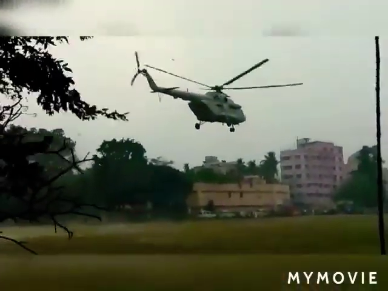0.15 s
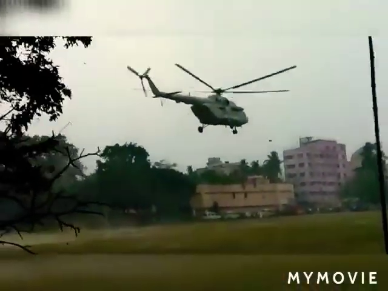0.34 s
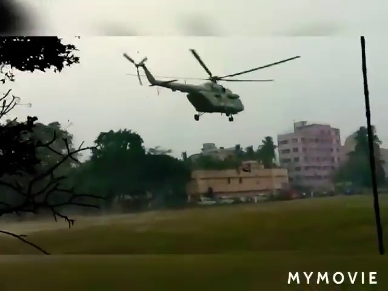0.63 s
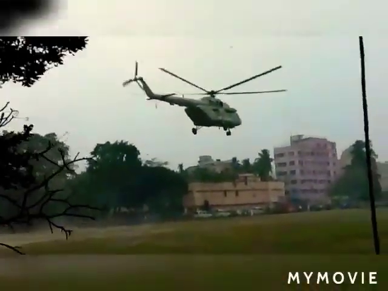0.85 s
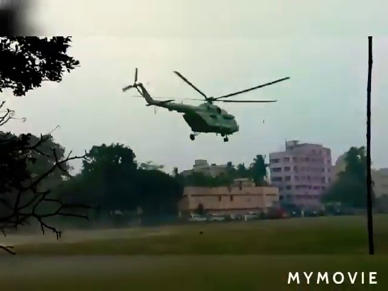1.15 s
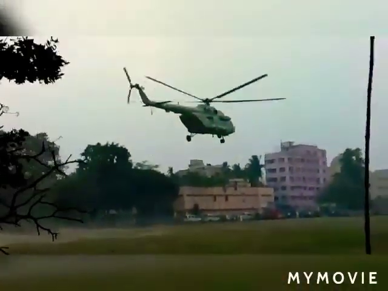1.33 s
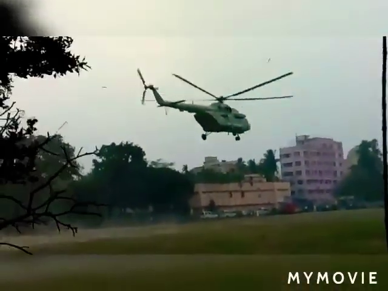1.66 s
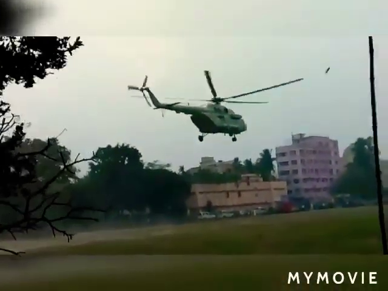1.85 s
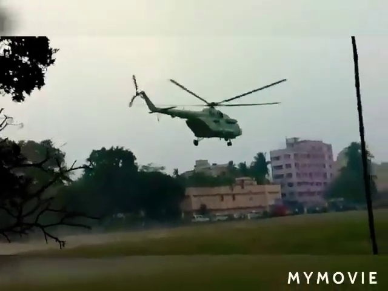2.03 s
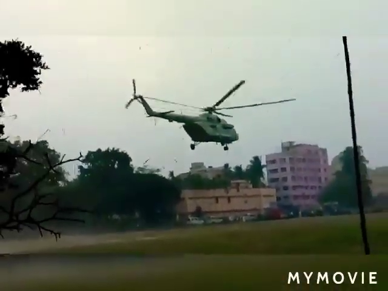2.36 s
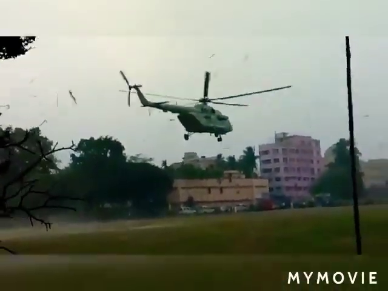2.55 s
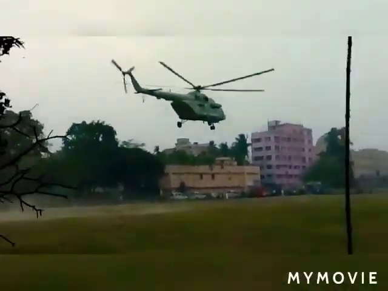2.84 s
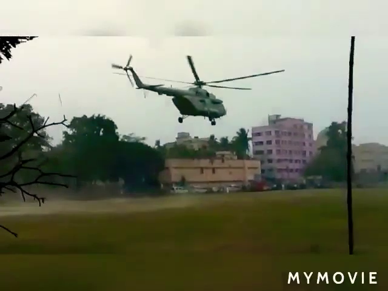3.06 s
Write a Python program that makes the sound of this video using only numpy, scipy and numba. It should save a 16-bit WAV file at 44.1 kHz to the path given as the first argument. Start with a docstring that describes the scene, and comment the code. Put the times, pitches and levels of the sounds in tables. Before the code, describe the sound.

A heavy helicopter hovers low and close, rotor chopping fast over roaring engines and buffeting wind.

```python
"""Low over a field, a heavy five-bladed turbine helicopter hovers, heard from a phone in its downwash. Each
blade is a burst of air noise; breathy tones on two of them swoop in pitch once a turn. The tail rotor drones in
harmonics, and the turbines hiss over a roar of shaped noise. Wind noise buffets the microphone and short
falling thumps land among it; brief noise swells add breathy whistle rises. Three sharp ringing ticks, probably
flying grit, make the limiter duck."""
import sys
import numpy as np
from scipy import signal
from scipy.fft import rfft, irfft
from scipy.io import wavfile
from numba import njit

SR = 44100
rng = np.random.default_rng(int(sys.argv[2]) if len(sys.argv) > 2 else 0)


def digitize_waveform(pressure):
    """Quantize a signal to 16-bit integers and store it at the path in sys.argv[1].

    Rows of a 2-D input are taken as channels; values are limited to [-1, 1].
    """
    field = np.atleast_2d(pressure).T
    bounded = np.clip(field, -1, 1)
    quanta = np.round(bounded * 32767).astype(np.int16)
    wavfile.write(sys.argv[1], SR, quanta)


N = 141120
T = np.arange(N) / SR  # time of every sample, seconds

# main rotor: time of one turn, time of the first blade pass
TURN_S, FIRST_BLADE_S, BLADES = .3133, .028, 5

# tail rotor: pitch of its blade rate, overall level, pitch waver as a fraction
TAIL_HZ, TAIL_DB, TAIL_WAVER = 56.05, -23.5, 0.0074
# tail rotor harmonics: multiple of its blade rate, relative level_db
TAIL_HARMONICS = [(1, 4), (2, 15.5), (3, 12.5), (4, -18.5), (5, -0.5), (6, -24)]

# tone of the rotor wake and exhaust: pitch_hz, relative level_db per Hz
ROAR_COLOUR = [(20, -31), (60, -6.5), (120, -2), (190, -1), (270, 0.5), (360, 0.5), (480, -2.5),
               (620, -9.5), (740, -8), (950, -18), (1300, -18.5), (2200, -22.5), (4000, -24), (15000, -74)]
# loudness of the wake and exhaust: time_s, level_db
ROAR_LEVEL = [(0, -19), (.25, -15.5), (.5, -13), (1, -12), (1.6, -12), (2.2, -13.5), (2.6, -12), (3.2, -16)]
ROAR_THROB_DB, ROAR_FLICKER_DB = 0.5, 1.5
RASP_HZ, RASP_WIDTH_HZ, RASP_THROB_DB = 807, 313, 1.5
# loudness of the hollow rasp in the rotor wake: time_s, level_db
RASP_LEVEL = [(0, -22), (.12, -18), (.35, -22), (.6, -22), (.8, -26), (1, -30), (1.45, -23.5), (1.8, -30),
              (2.2, -29.5), (2.8, -26), (3.2, -28.5)]

# tone of the turbine hiss: pitch_hz, relative level_db per Hz
TURBINE_COLOUR = [(800, -10), (1600, -1.5), (2300, -4), (3050, 1), (3600, -0.5), (4200, -6), (5000, 0),
                  (5800, 2.5), (6600, 3.5), (7200, -4.5), (8100, -14), (9600, -20), (11200, -29.5),
                  (12700, -28.5), (13700, -35), (15000, -27), (16000, -36)]
# loudness of the turbine hiss: time_s, level_db
TURBINE_LEVEL = [(0, -17), (.06, -15), (.2, -17), (.28, -19.5), (.55, -18.5), (.75, -18.5), (1.05, -18.5),
                 (1.25, -18.5), (1.5, -20), (1.68, -18.5), (1.88, -18), (2.1, -20.5), (2.28, -17.5),
                 (2.45, -21), (2.67, -19), (2.8, -19), (3.05, -18.5), (3.2, -15.5)]
TURBINE_FLICKER_DB = 1.25
WHINE_HZ, WHINE_WIDTH_HZ, WHINE_DB = 6245, 35, -38

# tone of wind on the microphone: pitch_hz, relative level_db per Hz
WIND_COLOUR = [(10, -24), (22, -7), (35, -28), (58, -7), (100, -2), (160, -5.5), (300, -11.5), (700, -14.5),
               (2000, -65)]
# loudness of the wind: time_s, level_db
WIND_LEVEL = [(0, -24), (.33, -33), (.41, -15), (.53, -14), (.66, -18), (1.05, -22), (1.2, -14), (1.5, -20),
              (1.75, -19), (1.9, -18), (2.15, -17), (2.35, -15.5), (2.8, -16.5), (3.2, -22)]
WIND_THROB_DB, WIND_LAG_S = 1.5, 0.03
# short, falling thumps: middle_s, peak level_db, pitch_hz at the middle
THUMPS = [(0.421, -5, 111), (0.501, -6, 101), (.605, -1.5, 147), (1.151, -2.5, 125), (1.205, -10, 102),
          (1.59, -7, 227), (1.902, -8, 100), (1.976, -4, 273), (2.119, -5, 103), (2.177, -3, 105),
          (2.302, -17, 100), (2.432, -0.5, 97), (2.533, -1, 96), (2.637, -8.5, 198), (2.748, -2.5, 94),
          (2.819, -6, 98), (2.866, -6.5, 144), (2.92, -8.5, 252), (2.989, -8.5, 242), (3.049, -5, 262),
          (3.111, 1, 290), (3.167, -8.5, 365)]
THUMP_S, THUMP_FALL_PER_S = 0.0058, 17.5  # swell width; share of the middle pitch lost per second

SWISH_ATTACK_S, SWISH_DECAY_S, SWISH_SCATTER_DB = 0.0026, 0.013, 2
# loudness of a blade swish at its crest, before the scatter: time_s, level_db
SWISH_LEVEL = [(0, -16), (.1, -9.5), (.35, -12), (.47, -16), (.58, -12), (.78, -10.5), (1.1, -19),
               (1.46, -14.5), (1.59, -12), (1.72, -8.5), (1.85, -16.5), (2.4, -18), (2.7, -16.5),
               (3.2, -19.5)]
# tone of the swish: pitch_hz, relative level_db per Hz
SWISH_COLOUR = [(150, -7), (500, 20), (1000, 4), (1800, 4.5), (3100, 10), (4300, -5.5), (6500, -16),
                (8500, -14), (15000, -37)]
# hard slaps of a blade cutting a wake: crest_s, level_db, centre pitch_hz
SLAPS = [(.092, -4, 850), (0.155, -17, 800), (0.344, -10.5, 900), (0.587, -16, 2500), (0.777, -15, 750),
         (.966, -19, 2520), (1.531, -12, 1190), (1.595, -12, 1820), (1.719, -19, 1600)]
SLAP_ATTACK_S, SLAP_DECAY_S, SLAP_WIDTH_HZ = 0.00033, 0.012, 1200

# breathy rises of a blade's whistle as the blade swings toward the listener:
# middle_s, level_db, centre pitch_hz
WHISTLE_RISES = [(0.058, -13, 6000), (.309, -19, 6470), (.747, -15.5, 6140)]
RISE_S, RISE_WIDTH_HZ = 0.004, 660
# whistles of two neighbouring blades: fastest_approach_s, top pitch_hz, level_db before beam and dulling
WHISTLES = [(.093, 10470, -19), (0.156, 9740, -19), (.406, 10600, -20.5), (0.467, 9700, -20.5),
            (.78, 9600, -24), (1.036, 10240, -23), (1.1, 9600, -18), (1.35, 10000, -29),
            (1.41, 9430, -16.5), (1.663, 10440, -25.5), (1.725, 9520, -17.5), (1.976, 10400, -23.5),
            (2.039, 9700, -16.5), (2.292, 10000, -28), (2.35, 9700, -21), (2.603, 10300, -25),
            (2.664, 9820, -17.5), (2.917, 10800, -22.5), (2.975, 10130, -18.5)]
# beam of a whistle: blade angle_rad from fastest approach, level_db
WHISTLE_BEAM = [(-1, -40), (-1, -3), (-.6, -16), (0.36, -3.5), (-0.41, 0), (0.766, 1), (1.28, -9),
                (2.4, -35)]
# dulling of a whistle: pitch_hz, level_db
WHISTLE_COLOUR = [(4000, 1.5), (6600, 4.5), (8000, -12), (10500, -9.5)]
WHISTLE_MACH = .575  # speed of the whistling spot as a share of the speed of sound
WHISTLE_WIDTH_HZ, WHISTLE_BREATH_HZ, WHISTLE_BREATH_DB = 450, 1300, -4

# grit ticking on the phone: start_s, level_db, ring pitch_hz
TICKS = [(.6155, 14, 5600), (2.456, 15, 3400), (2.4648, 17.5, 3200)]
TICK_DECAY_S, TICK_CRACK_DB, TICK_CRACK_HZ = .00035, -12, 5500

LIMIT_DB, LIMIT_ATTACK_S, LIMIT_RELEASE_S = -2, 0.00022, .033
CLIP_LEVEL, CLIP_HARDNESS = 0.65, 14
TOP_HZ = 15700  # cutoff of the final treble cut


def undb(db):
    """Turn decibels into gain."""
    return 10 ** (np.asarray(db) / 20)


def unit(x):
    """Scale to an average (rms) strength of 1."""
    return x / np.sqrt(np.mean(x ** 2))


def curve(table, at=T):
    """Draw straight lines through the rows of a table."""
    return np.interp(at, *np.array(table, float).T)


def noise(colour):
    """Noise of rms 1, its tone shaped by pitch and level points."""
    hz, db = np.array(colour, float).T
    f = np.maximum(np.fft.rfftfreq(N, 1 / SR), 1)
    shape = undb(np.interp(np.log(f), np.log(hz), db))
    return unit(irfft(rfft(rng.standard_normal(N)) * shape, N))


def band(centre_hz, width_hz):
    """Noise of rms 1 in a bell-shaped band."""
    f = np.fft.rfftfreq(N, 1 / SR)
    shape = np.exp(-((f - centre_hz) / width_hz) ** 2)
    return unit(irfft(rfft(rng.standard_normal(N)) * shape, N))


def walk(rate_hz):
    """Random wandering with a spread of 1; a higher rate wanders faster."""
    return band(0, rate_hz)


def bump(at_s, width_s):
    """A smooth swell around one moment."""
    return np.exp(-.5 * ((T - at_s) / width_s) ** 2)


def burst(at_s, attack_s, decay_s):
    """A quick swell and an exponential fall."""
    return np.where(T < at_s, bump(at_s, attack_s), np.exp(-abs(T - at_s) / decay_s))


def throb(lag_s):
    """A cosine at the blade rate that peaks lag_s after each pass."""
    return np.cos(2 * np.pi * (T - FIRST_BLADE_S - lag_s) * BLADES / TURN_S)


@njit
def follow(x, attack, release):
    """Track peaks, moving by one share of the gap when rising and another when falling."""
    out, level = np.empty(len(x)), 0.
    for i in range(len(x)):
        level += (x[i] - level) * (attack if x[i] > level else release)
        out[i] = level
    return out


def tail_rotor():
    """A low drone whose harmonics fade in and out in the turbulent air."""
    hz = TAIL_HZ * (1 + TAIL_WAVER * walk(2.55))
    phase = 2 * np.pi * np.cumsum(hz) / SR
    drone = np.zeros(N)
    for multiple, db in TAIL_HARMONICS:
        gain = undb(db + 1.15 * walk(2))
        drone += gain * np.sin(multiple * phase + rng.uniform(0, 2 * np.pi))
    return undb(TAIL_DB) * unit(drone)


def roar():
    """Rotor wake and exhaust throb lightly at the blade rate, with a hollow rasp that fades unevenly."""
    body_db = curve(ROAR_LEVEL) + ROAR_THROB_DB * throb(lag_s=.001) + ROAR_FLICKER_DB * walk(20)
    rasp_db = curve(RASP_LEVEL) + RASP_THROB_DB * throb(lag_s=.004)
    return noise(ROAR_COLOUR) * undb(body_db) + band(RASP_HZ, RASP_WIDTH_HZ) * undb(rasp_db)


def turbines():
    """Broad, flickering engine hiss with a compressor whine made of a thin band of noise."""
    hiss = noise(TURBINE_COLOUR) * undb(curve(TURBINE_LEVEL) + TURBINE_FLICKER_DB * walk(34))
    return hiss + undb(WHINE_DB) * band(WHINE_HZ, WHINE_WIDTH_HZ)


def downwash():
    """Wind rumbles on the microphone at the blade rate; short, falling thumps land among it."""
    out = noise(WIND_COLOUR) * undb(curve(WIND_LEVEL) + WIND_THROB_DB * throb(WIND_LAG_S))
    for at, db, hz in THUMPS:
        age = T - at
        turns = hz * age * (1 - THUMP_FALL_PER_S * age / 2)
        wave = np.sin(rng.uniform(0, 2 * np.pi) + 2 * np.pi * turns)
        out += undb(db) * bump(at, THUMP_S) * wave
    return out


def blade_swish():
    """A burst of air noise as each blade sweeps toward the listener, and a few hard slaps."""
    passes = np.arange(FIRST_BLADE_S, T[-1], TURN_S / BLADES)
    sizes = undb(SWISH_SCATTER_DB * rng.standard_normal(len(passes)))
    gate = sum(size * burst(at, SWISH_ATTACK_S, SWISH_DECAY_S) for at, size in zip(passes, sizes))
    out = gate * undb(curve(SWISH_LEVEL)) * noise(SWISH_COLOUR)
    for at, db, hz in SLAPS:
        out += undb(db) * burst(at, SLAP_ATTACK_S, SLAP_DECAY_S) * band(hz, SLAP_WIDTH_HZ)
    return out


def whistle_rises():
    """Breathy rise of a blade's whistle as it swings toward the listener: a brief swell of band noise."""
    return sum(undb(db) * bump(at, RISE_S) * band(hz, RISE_WIDTH_HZ) for at, db, hz in WHISTLE_RISES)


def blade_whistles():
    """Breathy tones ride round on two blades; speed toward the listener raises the pitch (Doppler)."""
    angle = np.linspace(-np.pi, np.pi, N)
    # sound sent out on the way round arrives earlier or later as the distance changes
    arrival_s = TURN_S * (angle - WHISTLE_MACH * np.sin(angle)) / (2 * np.pi)
    core = walk(WHISTLE_WIDTH_HZ) + 1j * walk(WHISTLE_WIDTH_HZ)
    breath = walk(WHISTLE_BREATH_HZ) + 1j * walk(WHISTLE_BREATH_HZ)
    flutter = core + undb(WHISTLE_BREATH_DB) * breath
    out = np.zeros(N)
    for at, top_hz, db in WHISTLES:
        near = abs(T - at) < TURN_S / 2
        heard_angle = np.interp(T[near] - at, arrival_s, angle)
        hz = top_hz * (1 - WHISTLE_MACH) / (1 - WHISTLE_MACH * np.cos(heard_angle))
        tone = (flutter[near] * np.exp(2j * np.pi * np.cumsum(hz) / SR)).real
        out[near] += tone * undb(db + curve(WHISTLE_BEAM, heard_angle) + curve(WHISTLE_COLOUR, hz))
    return out


def grit():
    """Very short, very strong cracks that ring the phone's case."""
    out = np.zeros(N)
    crack = undb(TICK_CRACK_DB) * band(TICK_CRACK_HZ, TICK_CRACK_HZ / 2)
    for at, db, hz in TICKS:
        age = np.maximum(T - at, 0)
        fade = (age > 0) * np.exp(-age / TICK_DECAY_S)
        out += undb(db) * fade * (np.sin(2 * np.pi * hz * age) + crack)
    return out


def scene():
    """Add up everything that reaches the single microphone."""
    steady = tail_rotor() + roar() + turbines() + downwash()
    blades = blade_swish() + whistle_rises() + blade_whistles()
    return (steady + blades + grit())[None]


def record(dry):
    """A limiter ducks after overloads, the remaining peaks are flattened, and the top is cut."""
    peak = follow(abs(dry[0]), 1 / max(LIMIT_ATTACK_S * SR, 1), 1 / (LIMIT_RELEASE_S * SR))
    limited = dry / np.maximum(peak / undb(LIMIT_DB), 1)
    # flatten at twice the sample rate, so fewer harsh false tones fold back
    held = signal.resample_poly(limited, 2, 1, axis=1)
    clipped = held / (2 + abs(held / CLIP_LEVEL) ** CLIP_HARDNESS) ** (1 / CLIP_HARDNESS)
    treble_cut = signal.firwin(801, TOP_HZ, window="blackman", fs=2 * SR)
    return signal.resample_poly(clipped, 1, 2, axis=1, window=treble_cut)


dry = scene()
out = record(dry)
digitize_waveform(out)
```